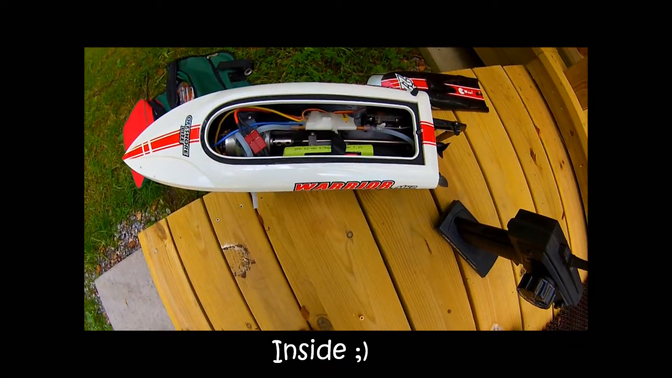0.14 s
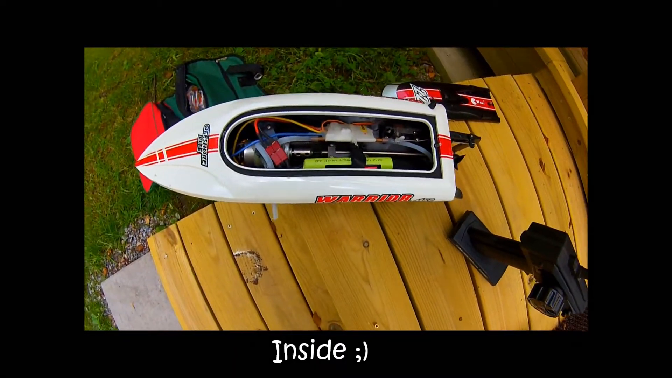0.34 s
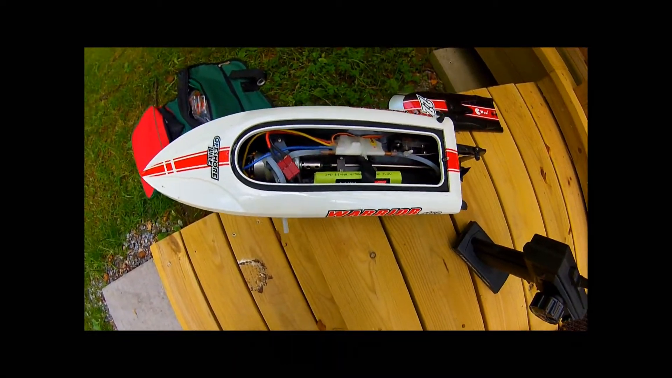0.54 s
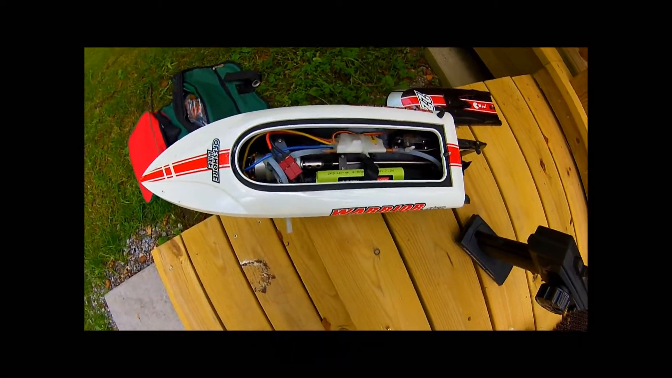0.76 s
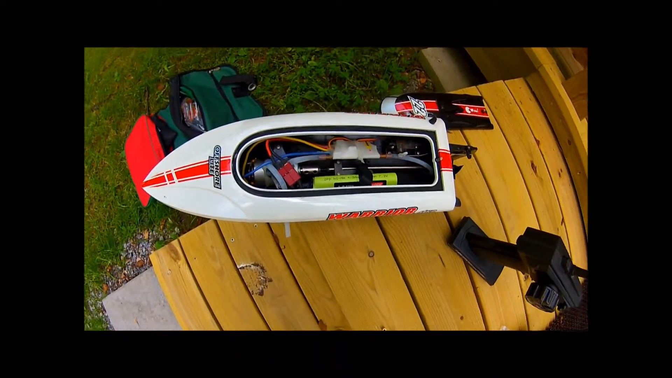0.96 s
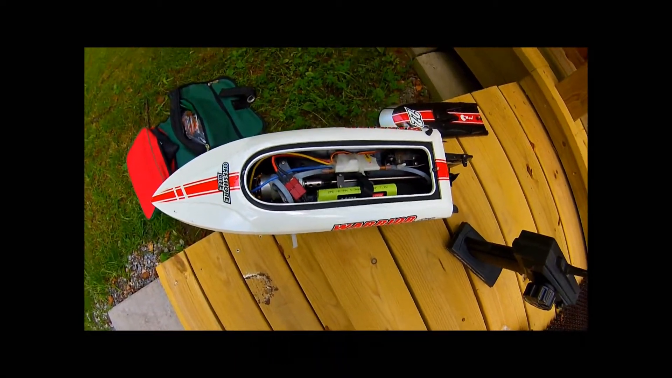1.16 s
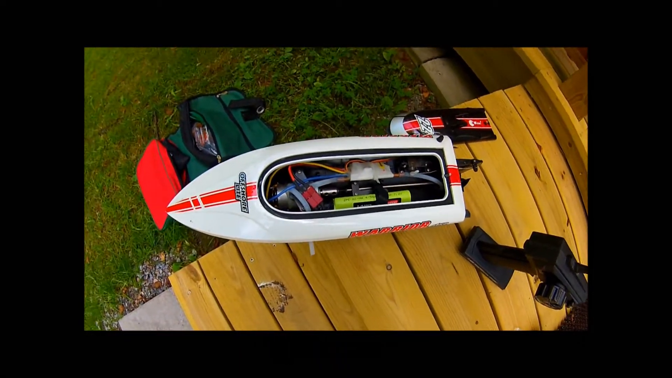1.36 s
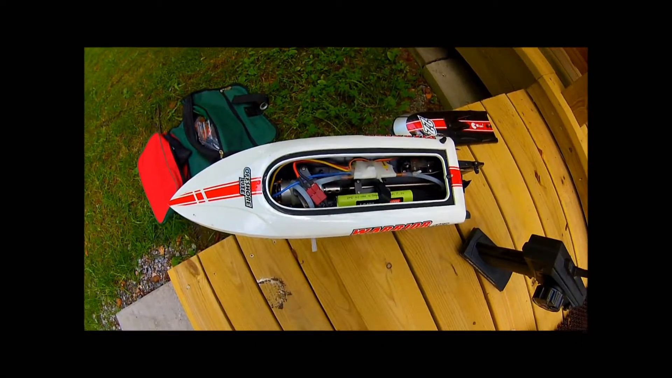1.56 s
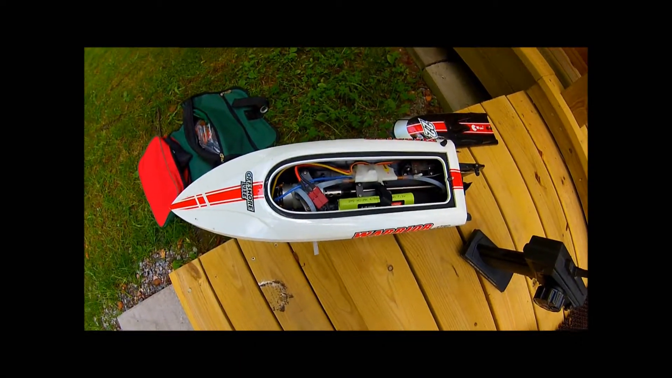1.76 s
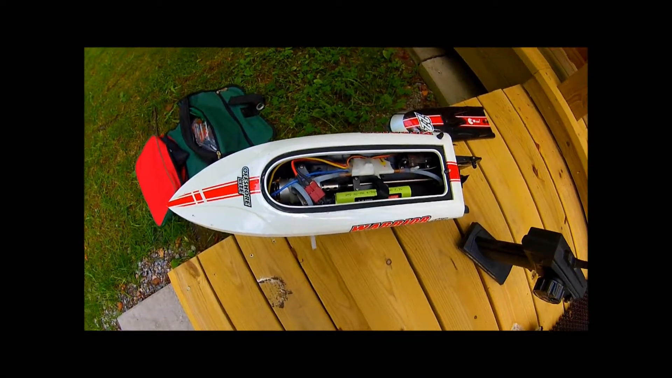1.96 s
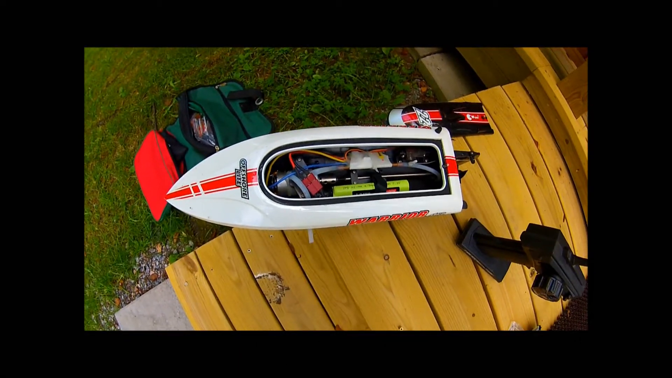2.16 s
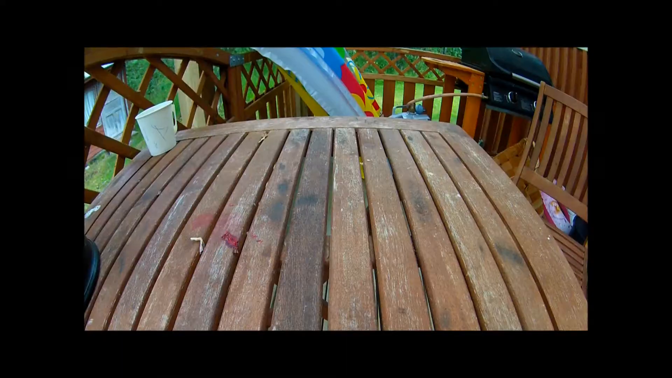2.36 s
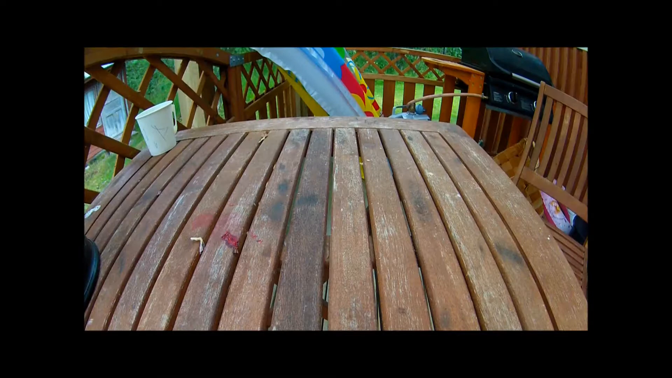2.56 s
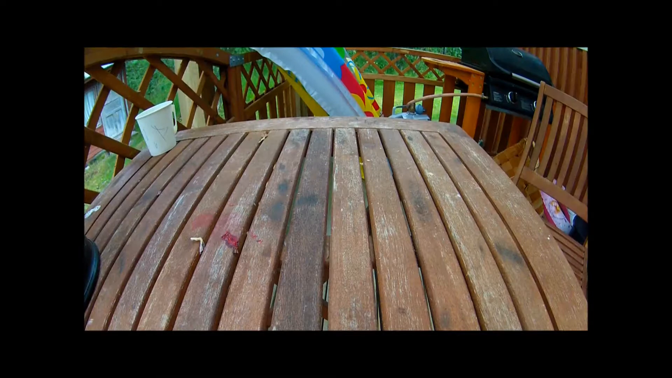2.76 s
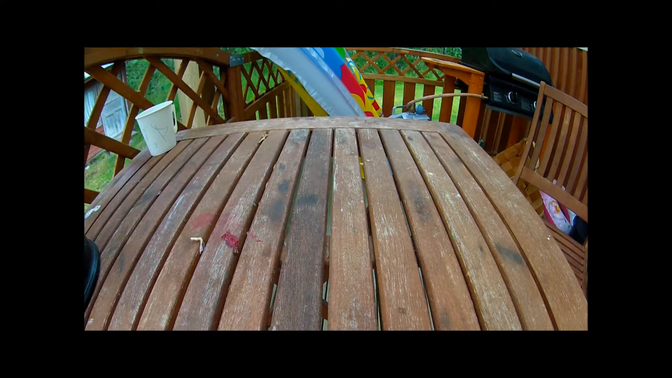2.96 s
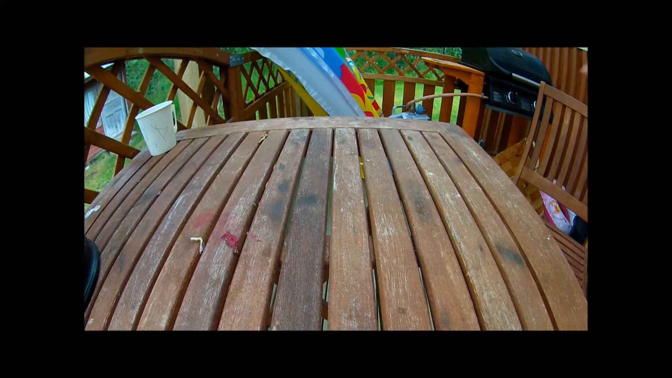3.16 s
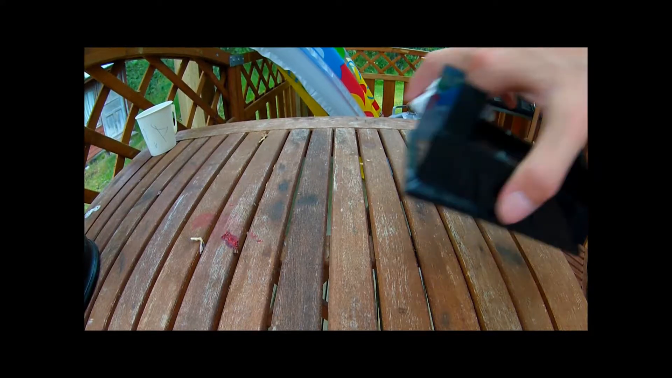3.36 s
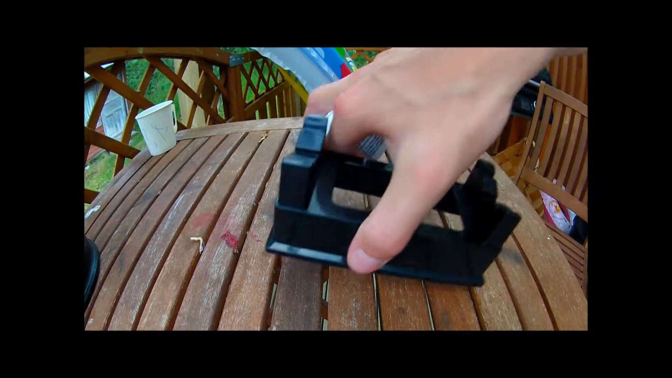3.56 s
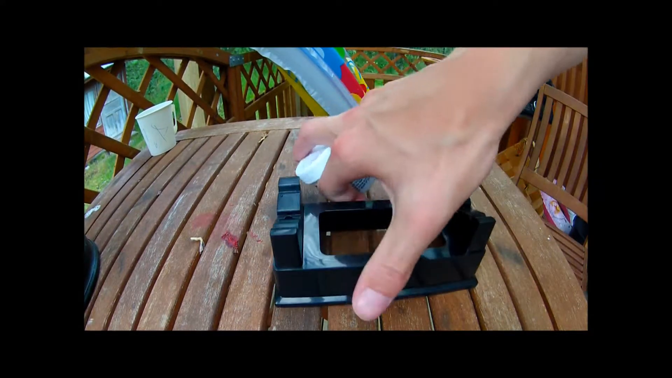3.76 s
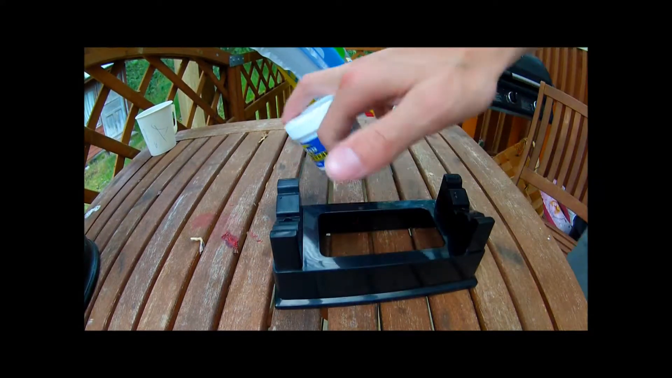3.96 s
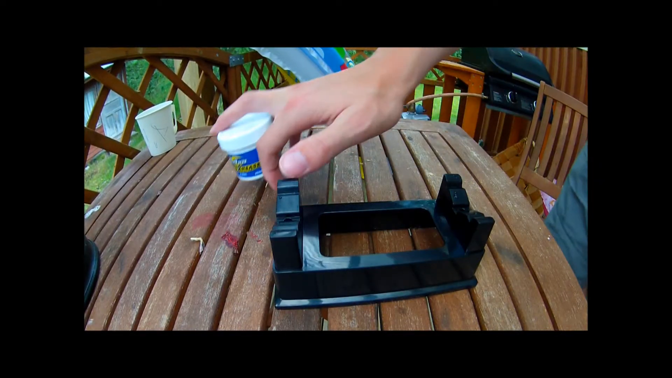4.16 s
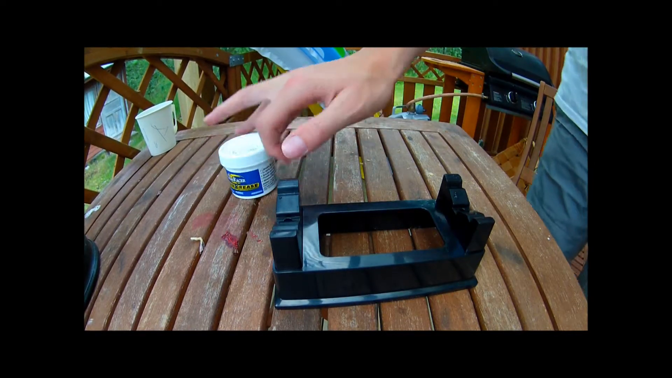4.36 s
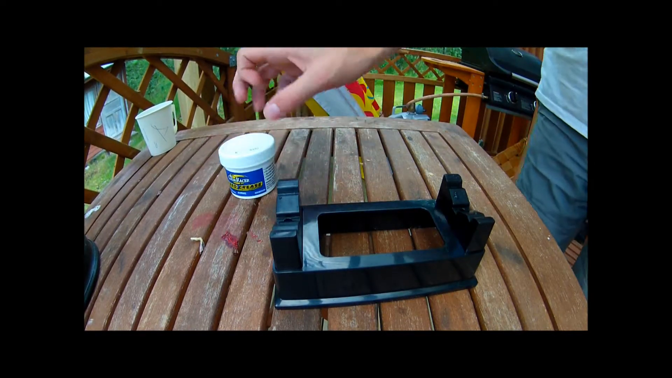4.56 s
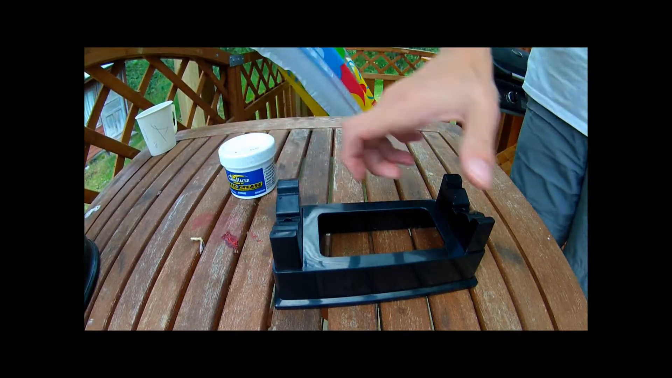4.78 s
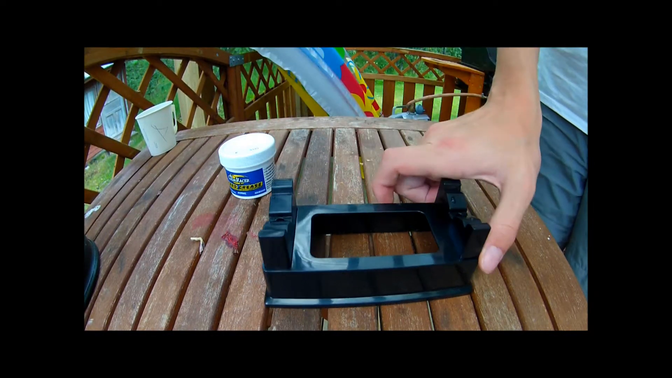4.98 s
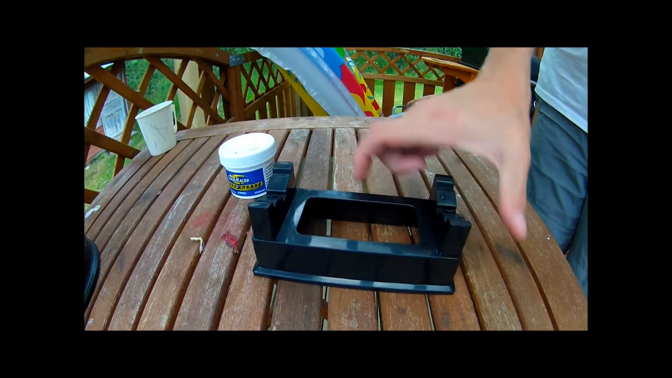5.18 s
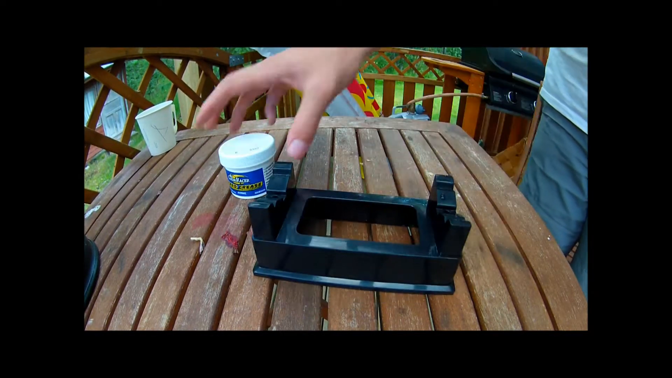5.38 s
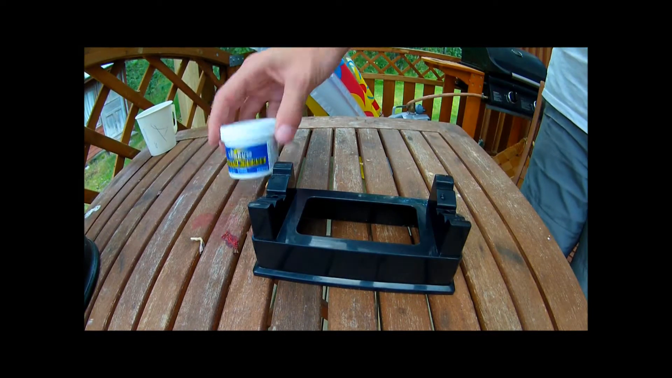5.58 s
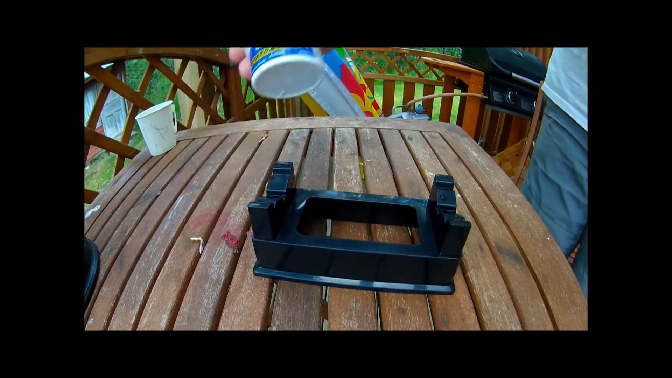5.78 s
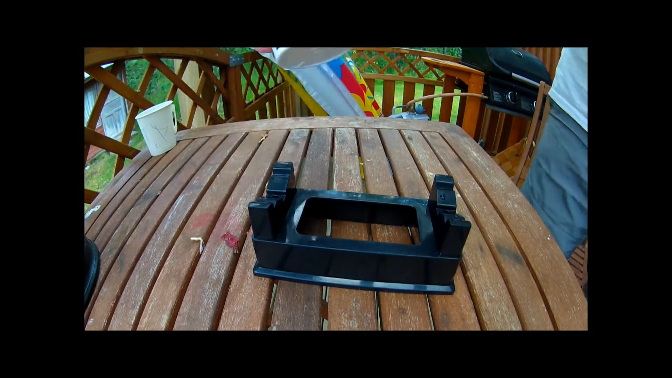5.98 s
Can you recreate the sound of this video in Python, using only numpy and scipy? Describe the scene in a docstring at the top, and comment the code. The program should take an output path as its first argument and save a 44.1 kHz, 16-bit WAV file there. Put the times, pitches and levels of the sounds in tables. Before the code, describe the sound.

Quiet outdoor air with a low rumble on the left and faint hand and sleeve rustles. A fingertip tick and loud button click come right at the microphone, then a tiny gap of silence. Faint far hoots and a rush pass. Close by, a hollow plastic stand clatters hard onto wooden slats, a small tub cracks against it and thuds down, its lid is lightly rubbed, and the stand scrapes briefly.

```python
"""Outdoors, hush, a rumble on the left and a few brushes of hand and sleeve surround the camera's microphone.
A fingertip ticks and a button clicks on the camera, the sound drops out briefly, and faint hoots and a rush pass far off.
Close by, a hollow plastic stand clatters onto slats; a small tub bumps it, is set down and its lid let go.
The stand is then pushed along the wood. Knocks ring decaying modes and noise, friction is shaped noise and slips,
and coarse 12 kHz sampling lays a gritty sheen over everything."""
import sys
import numpy as np
from scipy import signal
from scipy.fft import rfft, irfft, next_fast_len
from scipy.io import wavfile

SR = 44100
rng = np.random.default_rng(int(sys.argv[2]) if len(sys.argv) > 2 else 0)


def digitize_waveform(pressure):
    """Quantize a signal to 16-bit integers and store it at the path in sys.argv[1].

    Rows of a 2-D input are taken as channels; values are limited to [-1, 1].
    """
    field = np.atleast_2d(pressure).T
    bounded = np.clip(field, -1, 1)
    quanta = np.round(bounded * 32767).astype(np.int16)
    wavfile.write(sys.argv[1], SR, quanta)


N = 265702
T = np.arange(N) / SR
RING_T = T[:SR // 3]
RETURN_S = 2.2247  # the end of the dropout

# clear resonances of the hollow plastic stand: (f/Hz, relative level/dB, t60/s)
STAND_MODES = [(463, -2.5, 0.079), (497.6, -3, 0.13), (675, 1, 0.2), (772, -9.5, 0.18), (854, -13, 0.12),
               (1095, 2.5, 0.11), (1258, -6, 0.13), (1393, 2.5, 0.099), (1760, -11, 0.058), (2360, 0, 0.09),
               (2432, -6.5, 0.13), (2613, -2, 0.096), (3000, -7.5, 0.1), (3790, -7, 0.1)]


def undb(db):
    """Decibels to gain."""
    return 10 ** (np.asarray(db) / 20)


def unit(x):
    """Scale to rms 1."""
    return x / np.std(x)


def onset_unit(x):
    """Scale a blow so that its first 20 ms have rms 1."""
    return x / np.std(x[:SR // 50])


def butter(x, hz, kind, order=2):
    """Causal low-pass or high-pass."""
    sos = signal.butter(order, min(hz, SR / 2 - 1), kind, fs=SR, output="sos")
    return signal.sosfilt(sos, x)


def noise(spectrum, size):
    """Noise of rms 1, coloured by (f/Hz, relative density/dB) points and empty from 6 kHz up."""
    hz, db = np.transpose(spectrum)
    length = next_fast_len(size)
    f = np.maximum(np.fft.rfftfreq(length, 1 / SR), 1)
    gain = undb(np.interp(np.log(f), np.log(hz), db)) * (f < 6000)
    return unit(irfft(rfft(rng.standard_normal(length)) * gain, length)[:size])


def add(track, s, sound):
    """Mix a sound into a track at a time."""
    part = track[int(s * SR):][:len(sound)]
    part += sound[:len(part)]


def fade(t60):
    """Free decay by 60 dB in t60; hand and table damp any longer ring to 0.16 s."""
    return np.exp(-np.log(1000) * RING_T / min(t60, .16))


def modal(modes, length, scatter_db=2.0):
    """Decaying modes; their weights and pitches depend a little on where the blow lands."""
    out = np.zeros(len(RING_T))
    for k, (hz, db, t60) in enumerate(modes):
        weight_chance, pitch_chance = rng.standard_normal(2)
        weight = (-1) ** k * undb(db + scatter_db * weight_chance)
        pitch = hz * (1 + 0.00387 * pitch_chance)
        out += weight * np.sin(2 * np.pi * pitch * RING_T) * fade(t60 * length)
    return out


def ring(modes, wash, wash_db, low_t60, high_t60, length, buzz_db=3):
    """A body's answer to one blow: clear modes in a wash of weaker ones, its bass and treble fading apart."""
    crowd = noise(wash, len(RING_T))
    low = signal.sosfiltfilt(signal.butter(2, 2200, fs=SR, output="sos"), crowd)
    high = crowd - low
    # the ringing edge buzzes against what it touches, so the treble comes in tiny bursts
    flicker = unit(butter(rng.standard_normal(len(RING_T)), 350, "low"))
    buzz = undb(buzz_db * flicker)
    dense = low * fade(low_t60 * length) + high * buzz * fade(high_t60 * length)
    return onset_unit(modal(modes, length)) + undb(wash_db) * onset_unit(dense)


def blows(table, body):
    """Each contact rings the body; a softer contact leaves the treble out."""
    out = np.zeros(N)
    for s, db, hz, length in table:
        struck = butter(body(length), hz, "low")
        add(out, s, undb(db) * onset_unit(struck))
    return out


def rebounds(table, count):
    """Each knock chatters: contacts come ever sooner, lose level per rebound and tend to a plain thud."""
    gap_share, thud_hz = .76, 596  # share of the last gap; brightness that the rebounds approach
    shrink = gap_share ** np.arange(count)
    gaps_passed = np.cumsum(shrink) - shrink
    contacts = []
    for s, db, hz, length, gap, loss_db, kept in table:
        for k, passed in enumerate(gaps_passed):
            brightness_hz = thud_hz + (hz - thud_hz) * kept ** k
            contacts.append((s + gap * passed, db - loss_db * k, brightness_hz, length))
    return contacts


def swell(length, peak_at=0.23):
    """Time axis and a hump that peaks at a share of its length."""
    t = np.arange(int(length * SR)) / SR
    skew = np.log(.5) / np.log(peak_at)
    return t, np.sin(np.pi * (t / length) ** skew) ** 2


def tones(table, overtone_db, waver):
    """Short, slightly unsteady tones with a weaker octave."""
    out = np.zeros(N)
    for s, length, hz, db in table:
        t, hump = swell(length)
        drift = unit(butter(rng.standard_normal(len(t)), 80, "low"))
        phase = 2 * np.pi * np.cumsum(hz * (1 + waver * drift)) / SR
        tone = np.sin(phase) + undb(overtone_db) * np.sin(2 * phase)
        add(out, s, undb(db) * hump * tone)
    return out


def air():
    """Steady outdoor hush that wavers a little, nearly alike in both channels."""
    # colour of the open air: (f/Hz, relative density/dB)
    hush_colour = [(30, 7.5), (60, 1.5), (100, 5), (300, 2.5), (850, -0.5), (1350, -3.5), (1800, -10),
                   (4000, -12), (5300, -16)]
    before_db, after_db = -53.5, -54  # a little lower after the dropout
    level_db = np.where(T < RETURN_S, before_db, after_db)
    waver = unit(butter(rng.standard_normal(N), 5.9, "low"))
    apart = undb(-15.0) * noise(hush_colour, N) * np.array([[1], [-1]])
    return undb(level_db + .5 * waver) * (noise(hush_colour, N) + apart)


def left_rumble():
    """Steady low noise in the left channel."""
    # colour of the rumble: (f/Hz, relative density/dB)
    rumble_colour = [(14, -2), (28, -2.5), (55, -8.5), (80, -16), (250, -28), (1500, -54.5)]
    return undb(-39) * noise(rumble_colour, N)


def rustles(count=6):
    """Soft puffs of broad friction noise: clear brushes of hand and sleeve, and faint stirring at random."""
    # the clear brushes: (t/s, length/s, centre f/Hz, level/dB)
    brushes = [(0.885, 0.041, 3400, -57), (1.175, 0.12, 1400, -57), (1.278, 0.051, 1610, -51.5),
               (2.518, 0.065, 3040, -51), (2.809, .05, 1000, -54), (3.266, 0.27, 3400, -59)]
    stir_s, stir_hz, stir_db = 0.055, 2000, -58
    stirs = []
    for k, (when, colour) in enumerate(rng.random((count, 2))):
        s = (k + when) * T[-1] / count
        stirs.append((s, stir_s, stir_hz * 2 ** (colour - .5), stir_db))
    out = np.zeros(N)
    for s, length, hz, db in brushes + stirs:
        t, hump = swell(length, peak_at=0.13)
        friction = noise([(hz / 4, -8), (hz, 0), (hz * 2, -8)], len(t))
        add(out, s, undb(db) * hump * friction)
    return out


def fingertip(length):
    """A glancing touch on the camera: a tiny snap and a short, hollow ring."""
    # hollow resonances of the touched camera: (f/Hz, relative level/dB, t60/s)
    tick_modes = [(543, -3, 0.033), (790, -2, 0.046), (1210, 4.5, 0.02), (2564, 0.5, 0.018)]
    snap = noise([(500, -6), (3300, 5), (5300, -11)], len(RING_T)) * fade(0.007 * length)
    hollow = modal(tick_modes, length, scatter_db=4.5)
    return onset_unit(hollow) + undb(-1.0) * onset_unit(snap)


def finger_ticks():
    """A fingertip ticks against the camera, right at the microphone."""
    # touches: (t/s, level/dB, contact brightness f/Hz, ring length factor)
    touches = [(1.9216, -41.5, 2810, 1), (1.9251, -35, 6920, 1.)]
    return blows(touches, fingertip)


def case(length):
    """The camera's stiff little case from within: a few heavily damped modes with fixed weights."""
    # resonances of the case: (f/Hz, relative level/dB, t60/s)
    case_modes = [(202, -11, 0.017), (570, -7.5, 0.019), (925, -7.5, 0.0076), (1255, 8, 0.011),
                  (1456, 1.5, 0.019), (1857, 1.5, 0.016), (2250, 3.5, .013), (2553, -0.5, 0.017),
                  (3146, -22.5, 0.064), (4720, -2.5, .011)]
    return modal(case_modes, length, scatter_db=0.0)


def button_clicks():
    """The camera's button gives and snaps, ringing the case."""
    # give, then snap: (t/s, level/dB, contact brightness f/Hz, ring length factor)
    presses = [(2.0232, -49.5, 499.3, 0.59), (2.0258, -10, 9020, 0.88)]
    return blows(presses, case)


def hoots():
    """Faint, distant hoots: wavering tones with an octave."""
    # far-off calls: (t/s, length/s, pitch f/Hz, level/dB)
    calls = [(2.23, 0.29, 354, -55.5), (2.63, 0.34, 358.4, -54)]
    return tones(calls, overtone_db=-7.5, waver=0.0062)


def far_swell():
    """A faint, hollow rush rises and sinks far away: narrow noise under a bell-shaped level."""
    peak_s, width_s, hz, level_db = 3.1, .28, 810, -56
    rise = np.exp(-((T - peak_s) / width_s) ** 2)
    return undb(level_db) * rise * noise([(hz / 2, -30), (hz, 0), (hz * 2, -30)], N)


def stand(length):
    """The hollow plastic stand on the slats: clear modes in a dense wash."""
    # crowd of weaker modes between the clear ones: (f/Hz, relative density/dB)
    stand_wash = [(60, -24), (150, -12), (300, -6), (550, 7.5), (850, -1.5), (1400, 1), (1950, -7),
                  (2700, -4), (3600, -7), (5300, -15)]
    return ring(STAND_MODES, stand_wash, wash_db=-1.5, low_t60=0.12, high_t60=0.13, length=length)


def stand_knocks():
    """The stand lands on one foot, then on the rest, and settles; pushed, it jerks free and catches again."""
    # knocks: (t/s, level/dB, contact brightness f/Hz, ring length factor, first rebound gap/s,
    # loss per rebound/dB, brightness share kept per rebound)
    landings = [(3.624, -20, 4900, 0.74, 0.014, 3, 0.26), (3.6272, -13, 3840, 0.3, 0.01, 9.5, 0.3),
                (3.672, -29.5, 1900, 0.63, 0.011, 4.5, 0.21), (3.7105, -14.5, 6500, 0.98, 0.008, 5, 0.55),
                (3.729, -13, 6800, 1.07, .013, 5.5, 0.53), (3.752, -16, 3570, 1.23, .008, 2, 0.65),
                (3.791, -22, 3800, 0.88, .0115, 4, 0.4), (3.812, -23.5, 880, 0.76, 0.011, 11, 0.5),
                (4.150, -44, 596, 1.1, .012, 23, 0.63), (4.182, -40, 2980, 1.03, 0.0098, 5.5, 0.3),
                (4.960, -41.5, 1980, 1.3, 0.0082, 17, 0.57), (5.073, -41.5, 1500, 0.55, 0.011, 16, 0.52)]
    return blows(rebounds(landings, count=4), stand)


def thump(knocks):
    """Knocks shake the camera through the table: a dull rumble that follows their strength."""
    strength = butter(np.abs(knocks), 50, "low")
    shake = noise([(20, -14.5), (100, 19.5), (400, -13.5), (5000, -53.5)], N)
    return undb(-17.5) * strength * shake


def squeaks():
    """A foot of the stand judders on the wood: short, unsteady tones."""
    # judders: (t/s, length/s, pitch f/Hz, level/dB)
    judders = [(3.644, 0.12, 673, -23.5), (3.797, 0.047, 681, -18.5), (4.194, 0.028, 663, -27),
               (4.918, 0.029, 668, -27), (4.959, 0.036, 664, -22.5), (4.962, 0.075, 479, -33.5),
               (5.187, 0.041, 476, -37)]
    return tones(judders, overtone_db=-25.5, waver=0.0083)


def rattle(count):
    """The landing feet rattle on the slats, too light to move the stand's low modes, then die down."""
    # colour of a single contact: (f/Hz, relative density/dB)
    contact_colour = [(700, -11), (1550, 4), (2050, -7), (2750, 4.5), (5300, -18.5)]
    start_s, eases_s, end_s = 3.713, 3.73, 3.828
    level_db, fall_db_per_s = -25, 163
    when, size = rng.random((count, 2)).T
    times = start_s + (end_s - start_s) * (np.arange(count) + when) / count
    levels = level_db + 7 * (size - .5) - fall_db_per_s * np.maximum(times - eases_s, 0)
    out = np.zeros(N)
    for s, db in zip(times, levels):
        contact = noise(contact_colour, len(RING_T)) * fade(.022)
        add(out, s, undb(db) * onset_unit(contact))
    return out


def rim(length):
    """The tub's rim against the stand: a hard, dry crack that leaves the stand ringing thinly."""
    colour = [(400, -10.5), (1200, 4.5), (2100, -5.5), (2550, 5.5), (3100, 1), (3600, -25), (5300, -11.5)]
    crack = noise(colour, len(RING_T)) * fade(0.033 * length)
    thin_ring = butter(modal(STAND_MODES, 1), 2200, "high")
    return onset_unit(crack) + undb(-10) * onset_unit(thin_ring)


def tub_cracks():
    """The tub grazes the stand with its rim."""
    # grazes: (t/s, level/dB, contact brightness f/Hz, ring length factor)
    grazes = [(4.2158, -22.5, 6100, 0.83)]
    return blows(grazes, rim)


def tub(length):
    """The tub's base clacks; the slats under it are slow to follow and answer with a low boom."""
    # clear modes of tub and slats: (f/Hz, relative level/dB, t60/s)
    tub_modes = [(1390, 4, 0.11), (2294, -6.5, 0.057), (2520, -9.5, 0.052)]
    slat_modes = [(185.5, -15, 0.18), (242, -7, 0.22), (278, -13, 0.17), (317, -12, 0.23), (439, -4, 0.15),
                  (481, 1, 0.12), (647, 3, 0.11), (733.5, 2, 0.14)]
    # weaker modes of tub and slats: (f/Hz, relative density/dB)
    tub_wash = [(600, -9.5), (1000, -5), (1450, 0.5), (1900, -18), (2400, -3.5), (3000, -11.5),
                (3700, -22.5), (5300, -26)]
    slat_wash = [(60, -9), (680, 6.5), (1200, -4.5), (2000, -24)]
    slat_rise_s, slat_db = 0.0053, 3.5
    clack = ring(tub_modes, tub_wash, wash_db=-4, low_t60=0.1, high_t60=0.07, length=length)
    slat_crowd = noise(slat_wash, len(RING_T)) * fade(0.184 * length)
    slats = onset_unit(modal(slat_modes, length)) + undb(-2) * onset_unit(slat_crowd)
    boom = slats * (1 - np.exp(-(RING_T / slat_rise_s) ** 2))
    return clack + undb(slat_db) * onset_unit(boom)


def tub_knocks():
    """The tub touches the table, then rocks onto its base from rim to rim."""
    # knocks: (t/s, level/dB, contact brightness f/Hz, ring length factor, first rebound gap/s,
    # loss per rebound/dB, brightness share kept per rebound)
    touchdowns = [(4.2165, -18, 1090, 0.84, 0.013, 6, 1), (4.3615, -21, 4500, 1.07, .016, 1, 0.19),
                  (4.4015, -21.5, 3560, 0.9, .016, 4.5, 0.2), (4.430, -30.5, 3300, 0.65, 0.014, 4, 0.28)]
    return blows(rebounds(touchdowns, count=2), tub)


def lid(length):
    """The tub's light lid: a few modes in a wash whose treble dies first."""
    # clear modes: (f/Hz, relative level/dB, t60/s)
    lid_modes = [(687, -4, 0.23), (1117, 3.5, 0.19), (1187, 1, 0.074), (1361, 1, 0.051)]
    # weaker modes: (f/Hz, relative density/dB)
    lid_wash = [(150, -16), (500, -9), (1250, 9), (2000, -1.5), (5300, -20)]
    return ring(lid_modes, lid_wash, wash_db=-6.5, low_t60=0.14, high_t60=0.063, length=length)


def lid_taps():
    """Light taps on the lid as the tub is let go."""
    # taps: (t/s, level/dB, contact brightness f/Hz, ring length factor, first rebound gap/s,
    # loss per rebound/dB (negative: gain), brightness share kept per rebound)
    taps = [(4.597, -41, 2480, 0.75, 0.022, 8.5, 0.27), (4.769, -43.5, 1800, 3, 0.0098, -2, 0.36),
            (4.862, -44, 3800, 3, 0.026, 6, 0.81)]
    return blows(rebounds(taps, count=2), lid)


def lid_rubs():
    """Fingertips drag over the lid as the tub is let go and gripped again: noise with the lid's colour."""
    # drags: (t/s, length/s, peak level/dB)
    drags = [(4.597, 0.19, -48.5), (4.764, 0.065, -49), (4.859, 0.056, -46.5), (5.492, 0.076, -56)]
    # colour of the rubbed lid: (f/Hz, relative density/dB)
    rub_colour = [(300, -38), (690, 7), (900, -29), (1140, 5.5), (1400, -9), (1900, -20), (5300, -33)]
    out = np.zeros(N)
    for s, length, db in drags:
        t, hump = swell(length, peak_at=0.2)
        add(out, s, undb(db) * np.sqrt(hump) * noise(rub_colour, len(t)))
    return out


def slide():
    """Pushed feet catch on the wood grain in uneven slips that ring the stand; speed brings out the grit."""
    # what the dragged stand hums with: (f/Hz, width/Hz, relative level/dB)
    drag_modes = [(355, 91, -1), (478, 35, -2.5), (650, 57, -0.5), (1120, 35, -4)]
    # slips of the feet on the grain: (f/Hz, relative density/dB)
    scrape_colour = [(600, -18), (900, -31), (1130, 7.5), (1350, 2), (1750, -1.5), (2200, -9), (2600, 2),
                     (3200, -11), (5300, -20)]
    start_s, end_s, attack_s, release_s = 4.925, 5.172, 0.03, 0.13
    surge_s, surge_width_s, creep_share = 5.112, 0.054, 0.27  # creep is a share of the top speed
    hum_db, grit_db = -41, -39
    slips_per_s, slip_t60_s = 2000, 0.034  # the rate is for all four feet together

    attack = np.clip((T - start_s) / attack_s, 0, 1)
    release = np.clip(1 - (T - end_s) / release_s, 0, 1) ** 2
    push = attack * release
    # it creeps, then surges once
    speed = creep_share + (1 - creep_share) * np.exp(-((T - surge_s) / surge_width_s) ** 2)
    slipping = rng.random((4, N)) < slips_per_s / 4 / SR
    feet = slipping * np.sign(rng.standard_normal((4, N)))
    hum = np.zeros(N)
    for hz, width, db in drag_modes:
        b, a = signal.iirpeak(hz, hz / width, fs=SR)
        hum += undb(db) * unit(signal.lfilter(b, a, feet.sum(0)))
    hum = unit(butter(butter(hum, 290, "high"), 1340, "low"))
    # each foot has its own short rasp, set off by every slip
    grit = np.zeros(N)
    for slips in feet:
        rasp = noise(scrape_colour, len(RING_T)) * fade(slip_t60_s)
        grit += signal.fftconvolve(slips, rasp)[:N]
    return push * (undb(hum_db) * hum + undb(grit_db) * speed * unit(grit))


def scene():
    """All the handling is close and central; the left channel also takes the thumps and a steady rumble."""
    clicks = finger_ticks() + button_clicks()
    knocks = stand_knocks() + rattle(count=14) + tub_cracks() + tub_knocks() + lid_taps()
    friction = rustles() + squeaks() + lid_rubs() + slide()
    near = clicks + knocks + friction
    left, right = near + air() + hoots() + far_swell()
    # close sounds come out deeper on the left
    proximity = undb(10.5) * butter(near, 85, "low", order=1)
    left = left + proximity + thump(knocks) + left_rumble()
    return np.array([left, right])


def record(dry):
    """A coarse converter, a little off centre on the left, that clips peaks beyond full scale; once, the sound
    briefly falls silent."""
    left_offset, top_hz = .088, 16400
    silent_s, fade_s = 2.198, .016  # the fade ends in silence here
    narrow = signal.sosfiltfilt(signal.butter(16, 5600, fs=SR, output="sos"), dry)
    # sampling at 12 kHz and holding each value mirrors the sound into the treble
    coarse = signal.resample(narrow, N * 12000 // SR, axis=1)
    held = np.repeat(coarse, 4, axis=1)
    smoothing = signal.ellip(8, .2, 50, 15200, fs=SR, output="sos")
    wide = signal.sosfilt(smoothing, signal.resample(held, N, axis=1))
    # the offset jumps back at the end of the dropout, which makes a tick
    gate = np.clip((silent_s - T) / fade_s, 0, 1) + (T >= RETURN_S)
    clipped = np.clip(wide + np.array([[left_offset], [0]]), -1, 1) * gate
    return signal.sosfiltfilt(signal.ellip(8, .1, 60, top_hz, fs=SR, output="sos"), clipped)


dry = scene()
out = record(dry)
digitize_waveform(out)
```